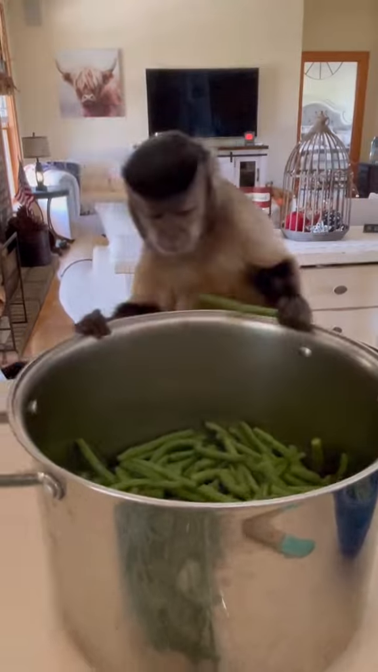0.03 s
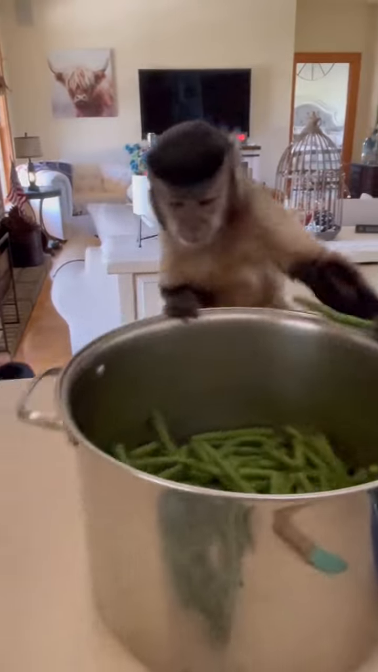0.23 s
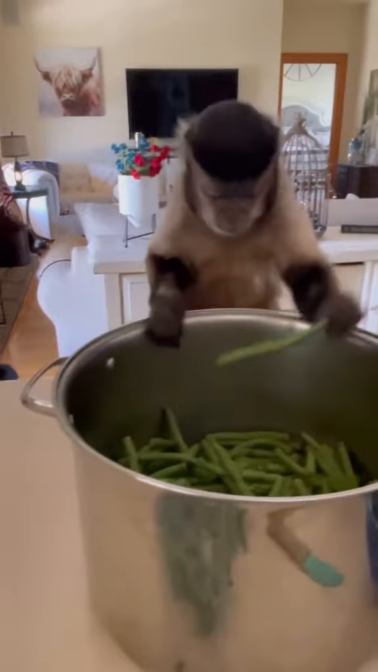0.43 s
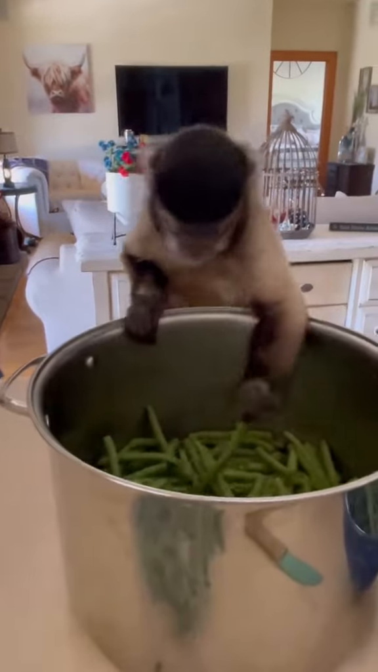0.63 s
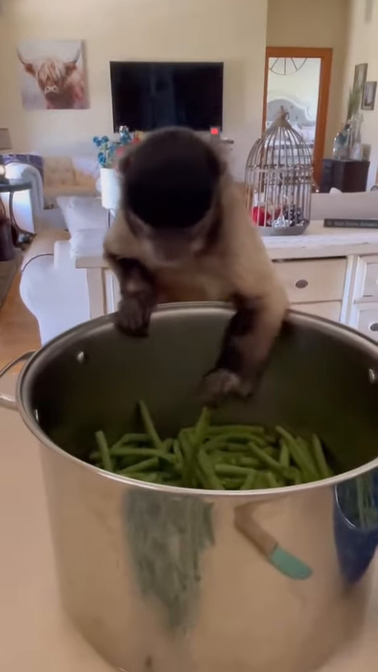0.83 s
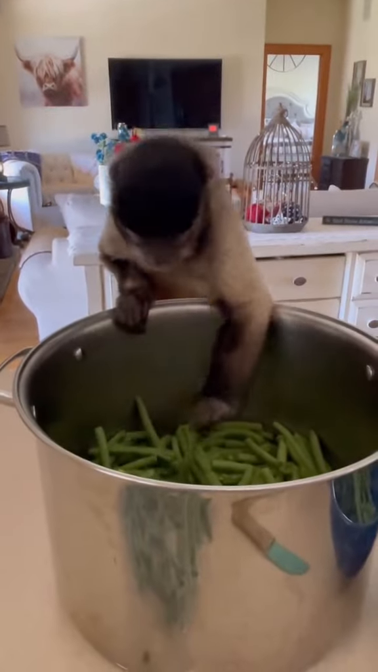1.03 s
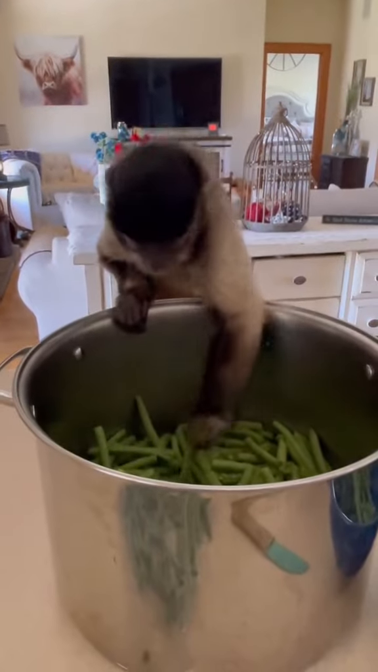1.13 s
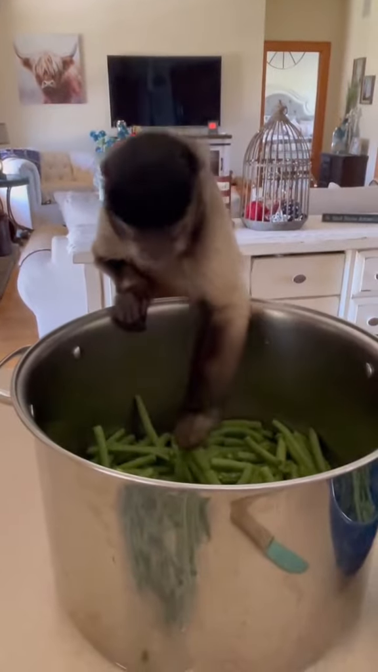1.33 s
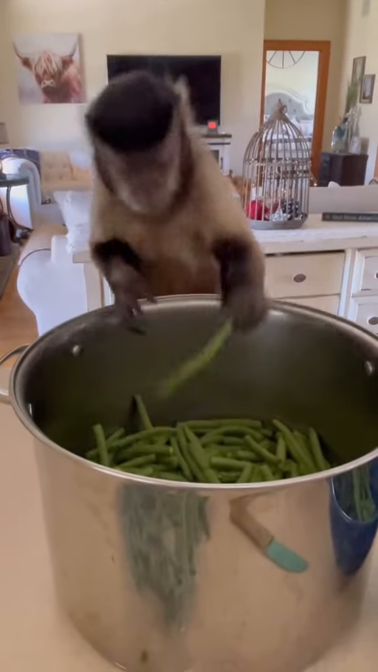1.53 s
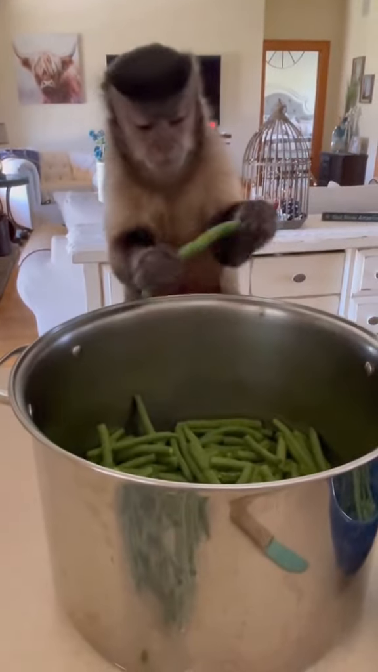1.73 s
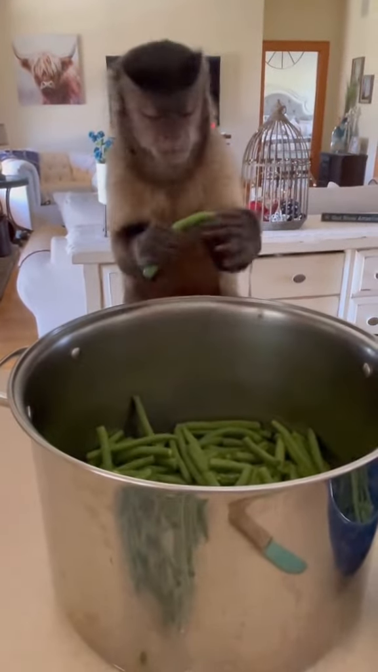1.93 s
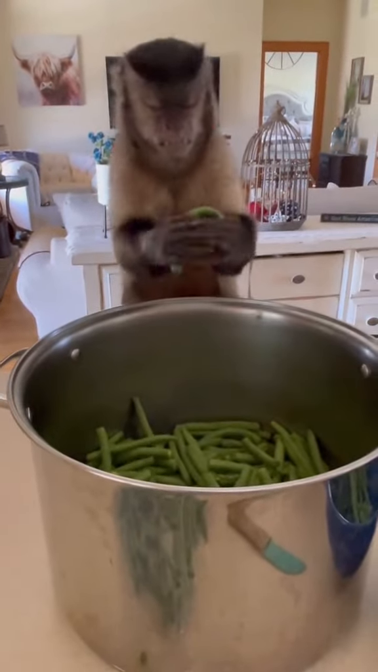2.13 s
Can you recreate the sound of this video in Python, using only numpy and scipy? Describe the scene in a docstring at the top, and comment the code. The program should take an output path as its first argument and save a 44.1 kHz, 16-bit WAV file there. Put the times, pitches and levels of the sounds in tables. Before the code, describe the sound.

Loud metallic clank of a large pot shoved on a countertop, then soft rustling and tiny snaps

```python
"""Steady low hums, two of them beating, and stereo room noise lie under everything.
A large steel pot slides over a counter (resonant friction noise), bangs down and bumps again: damped modes,
crack and knock noise, pitch-dropping counter thuds; noise tails let the room ring out.
Then soft thuds, taps and noise brushes as a small animal reaches among green beans; two faint rubs follow.
Last, a bean cracks: short noise creaks and ticks of fast-dying sines."""
import sys
import numpy as np
from scipy import signal
from scipy.fft import rfft, irfft
from scipy.io import wavfile
from scipy.ndimage import uniform_filter1d

SR = 44100
rng = np.random.default_rng(int(sys.argv[2]) if len(sys.argv) > 2 else 0)


def unload_wav(signal):
    """Save mono or channel-first audio to the path in sys.argv[1] as 16-bit WAV at rate SR, clipped to [-1, 1]."""
    wavfile.write(
        sys.argv[1],
        SR,
        np.round(np.clip(np.atleast_2d(signal).T, -1, 1) * 32767).astype(np.int16),
    )


def ratio_of_db(decibels):
    """Turn decibels (scalar or array-like) into linear amplitude factors; 0 dB maps to 1."""
    return 10 ** (np.asarray(decibels, float) / 20)


N = 97020

# pot modes: f/Hz, level/dB, t60/s
POT_MODES = [(285.1, -3, .25), (334.6, -7, .15), (430, -9, 0.087), (510, -13.5, .12), (586, -18, 0.12),
             (872, -11, 0.2), (1166, -6, 0.25), (1300, -6, 0.16), (1491, -11, 0.08), (1880, -5, 0.13),
             (2056, -2, 0.11), (2402, -7, 0.24), (2676, -7, 0.2), (3100, -3, 0.12), (3300, -11, .18),
             (3537, -7, 0.09), (4300, -8, 0.07), (4888, -9, .06), (5609, -9, .1), (6810, -14, .13),
             (8188, -13, .15)]
# pot blows: t/s, ring level/dB, contact/s, crack level/dB, knock level/dB, t60 of both noises/s
BLOWS = [(0.2238, -22.5, 0.000079, -18.5, -33.5, 0.065), (0.233, -31, 0.00039, -30, -27, 0.15),
         (.275, -33.5, 0.000065, -28.5, -32, 0.077), (0.3227, -28.5, 0.00036, -29, -21, 0.02),
         (0.329, -35, 0.00078, -47, -26, 0.11), (.36, -41.5, 0.0021, -52, -32.5, 0.049)]
# spectral density of the bright crack: f/Hz, level/dB
CRACK_SPECTRUM = [(300, -26.5), (1000, -17), (2500, -5), (4000, -1), (6000, -6.5), (8000, -7), (10600, -6),
                  (14000, -22)]
# spectral density of the dull knock: f/Hz, level/dB
KNOCK_SPECTRUM = [(100, -15), (300, 5.5), (550, -5), (1000, -4.5), (2500, -9.5), (4500, -36)]
# friction noise of the slide: t/s, level/dB
SLIDE_LEVEL = [(0, -49), (.09, -44.5), (.204, -42.5), (.22, -43), (.245, -35.5), (.3, -41.5), (0.334, -45)]
# its spectral density: f/Hz, level/dB
SLIDE_SPECTRUM = [(45, -36), (85, -5), (381, -5), (658, -14), (755, -10), (2360, -6.5), (2710, -3.5),
                  (5370, -6), (9290, -10.5), (11100, -5.5), (14000, -33.5)]
# resonances of the sliding contact: f/Hz, width/Hz, level/dB
SLIDE_PEAKS = [(730, 65, 0), (1400, 90, -3.5), (2605, 62, -2.5), (3885, 35, 4), (5400, 300, -1),
               (6870, 250, -3)]
# counter thuds, high bending waves first: t/s, level/dB, first f/Hz, last f/Hz, t60/s
THUDS = [(0.1092, -32, 1400, 106, 0.093), (0.231, -4, 194, 158.8, 0.033), (0.279, -20.5, 199.6, 132, 0.082),
         (0.3226, -20, 1400, 102.3, 0.16), (.335, -27.5, 356, 267, 0.17), (0.612, -49.5, 119.1, 90.4, 0.28),
         (0.63, -43.5, 118.4, 90, 0.12), (0.817, -44, 132.8, 91.5, 0.19), (0.956, -43.5, 122.5, 84, 0.13),
         (0.993, -53, 109, 86, 0.1), (1.096, -44.5, 299, 99, 0.11), (1.418, -49.5, 109.5, 80.2, 0.092)]
# counter-top modes: f/Hz, level/dB, t60/s
TOP_MODES = [(205, -2, .07), (345, -3, .12), (745, -6, .16), (1180, -4, .21), (1810, -11, .2)]
# light taps on the counter: t/s, level/dB, hardness (mode tilt)/dB per octave
TAPS = [(.113, -42.5, -5), (0.609, -79, 18.5), (0.806, -68, -8.5), (0.954, -61, -3), (1.094, -70.5, -10.5),
        (1.365, -80.5, 8)]
# brushes of fur and beans: t/s, length/s, level/dB, full-bodied share/0-1
BRUSHES = [(0.559, 0.11, -75.5, 0.36), (0.777, 0.071, -74, 0.16), (0.915, 0.12, -72.5, 0.07),
           (1.054, 0.06, -76, 0.02), (1.344, 0.1, -82, 0.2), (1.459, 0.083, -63, 0.95)]
# spectral density of a thin brush: f/Hz, level/dB
THIN_SPECTRUM = [(880, -1.5), (1500, -4.5), (2380, -10), (2580, -13), (4940, -7.5), (7490, -6),
                 (8890, -13.5), (10700, 0), (13000, -33)]
# spectral density of a full-bodied brush: f/Hz, level/dB
FULL_SPECTRUM = [(350, -51), (600, -2), (1700, -28), (2540, -3.5), (3370, -3), (3730, -2.5), (4030, -11),
                 (8950, -10), (10900, -27), (13000, -33.5)]
# resonances of the full-bodied brush: f/Hz, width/Hz, level/dB
BRUSH_PEAKS = [(2610, 32, 0.5), (3290, 400, -8.5), (3960, 130, 0), (4440, 150, -1), (5080, 90, 0),
               (6190, 150, -5.5)]
# faint narrow hisses: t/s, length/s, level/dB, f/Hz
RUBS = [(1.535, .055, -80, 3300), (1.585, .07, -85, 2520)]
# bean skin cracking: t/s, peak level/dB
TICKS = [(2.0256, -46.5), (2.0287, -56), (2.1484, -55), (2.1503, -64.5), (2.1721, -54), (2.1751, -50.5),
         (2.1792, -49)]
# bean modes: f/Hz, level/dB, t60/s
BEAN_MODES = [(2630, -20, 0.0075), (5870, -5, 0.005), (8080, -11, 0.0063), (10500, -4, 0.0042),
              (11400, -0.5, 0.0043)]
# fibres straining: t/s, hold/s, level/dB, t60/s
CREAKS = [(2.009, 0.021, -72, 0.056), (2.153, 0.004, -76, 0.11), (2.178, 0.012, -68, 0.053)]
# spectral density of a creak: f/Hz, level/dB
CREAK_SPECTRUM = [(1180, -52), (2000, -18), (3050, -24), (3570, -11), (4550, -14), (6230, -17), (6730, 0),
                  (9070, -9), (11500, 0), (13000, -17)]
# room decay: f/Hz, t60/s
ROOM_T60 = [(100, 0.64), (300, 0.65), (1000, 0.7), (2500, 0.65), (5500, 0.4734), (8000, 0.31),
            (12000, 0.26)]
# side relative to mid in reflections: f/Hz, level/dB
SIDE_SPECTRUM = [(60, -31.5), (180, -35.5), (530, -3), (1550, -7.5), (4600, 0.5), (13600, 0)]
# steady appliance hums: f/Hz, rms level/dB
HUMS = [(45.8, -67), (53.9, -64), (60, -77), (119, -77)]
# spectral density of the room tone: f/Hz, level/dB
QUIET_SPECTRUM = [(30, -21.5), (50, -9), (85, -13.5), (123, -11.5), (200, -11.5), (363, -21.5),
                  (526, -28.5), (1230, -41.5), (4000, -50.5), (14100, -54)]
# left-right correlation of the room tone: f/Hz, correlation/1
QUIET_LIKENESS = [(60, 1.0), (230, 0.91), (900, 0.34), (3510, 0.21), (13600, 0.28)]
# slow swell of the lower room tone: t/s, level/dB
QUIET_SWELL = [(1.25, -6), (1.5, 0), (1.75, -2.5), (2.0, -5)]
# microphone response: f/Hz, level/dB
MIC_RESPONSE = [(8200, 0.5), (9000, -8.5), (9800, -1.5), (12000, 1), (13000, -1.5), (13400, -22)]

UNEVEN_DB = 1.5  # spread of mode levels from hit to hit
CRACK_RISE_S, CRUNCH_DB = 0.0012, 1.2
FADE_FROM_S, FADE_DB_PER_S = 0.65, 245.5  # from this time any remaining pot ring fades faster
SLIDE_STOP_T60_S, SLIDE_RING_DB, SLIDE_WANDER_DB = 0.021, -4.5, 6
THUD_RISE_CYCLES, THUD_FALL_S = 0.79, 0.0049
TAP_RISE_S, PUFF_DB, PUFF_T60_S = 0.0051, 0, 0.076
BRUSH_SKEW, BRUSH_RING_DB = 0.75, 4
HUMS_IN_STEP_S = 1.54
QUIET_DB, SWELL_BELOW_HZ = -66.5, 1200
EARLY_DB, EARLY_T60_S = 3, 0.095
NEAR_DB, NEAR_T60_S = -11, 0.01
RING_WET_DB, NOISE_WET_DB, BRUSH_WET_DB, TICK_WET_DB = -17, -7.5, -9, -12.5
LOW_CUT_HZ = 50


def evened(x):
    """Scales to unit rms."""
    return x / np.sqrt(np.mean(x ** 2) + 1e-20)


def read(points, f_hz):
    """Interpolates a table over log frequency."""
    point_hz, value = np.transpose(points)
    return np.interp(np.log(f_hz + 1), np.log(point_hz + 1), value)


def add(mix, t_s, sound):
    """Adds a sound in place, cut at the end of the mix."""
    part = mix[max(round(t_s * SR), 0):][:len(sound)]
    part += sound[:len(part)]


def colour(x, points):
    """Filters by a spectrum table."""
    f_hz = np.fft.rfftfreq(x.shape[-1], 1 / SR)
    return irfft(rfft(x) * ratio_of_db(read(points, f_hz)), x.shape[-1])


def resonate(x, f_hz, width_hz):
    """Two-pole resonance of peak gain 1."""
    b, a = signal.iirpeak(f_hz, f_hz / max(width_hz, 20), SR)
    return signal.lfilter(b, a, x)


def ring(modes, t_s, offsets_db):
    """Dying sines, each with its own level offset."""
    return sum(ratio_of_db(db + offset_db - 60 * t_s / t60_s) * np.sin(2 * np.pi * f_hz * t_s)
               for (f_hz, db, t60_s), offset_db in zip(modes, offsets_db))


def pot():
    """Soft-edged pushes excite the modes; each blow adds bright crack and dull knock noise."""
    tones, noises = np.zeros(N), np.zeros(N)
    t_s = np.arange(SR // 2) / SR
    crack = evened(colour(rng.standard_normal(N), CRACK_SPECTRUM))
    knock = evened(colour(rng.standard_normal(N), KNOCK_SPECTRUM))
    # loose beans rattle in the crack
    rattle = evened(uniform_filter1d(rng.standard_normal(N), size=70))
    crack = evened(crack * ratio_of_db(CRUNCH_DB * rattle))
    uneven_db = UNEVEN_DB * rng.standard_normal((len(BLOWS), len(POT_MODES)))
    for (start_s, ring_db, contact_s, crack_db, knock_db, t60_s), offsets_db in zip(BLOWS, uneven_db):
        push = t_s[:400] * np.exp(-t_s[:400] / (abs(contact_s) / 4 + 1e-5))
        fade = ratio_of_db(-FADE_DB_PER_S * np.maximum(t_s - max(FADE_FROM_S - start_s, 0), 0))
        modes = fade * ring(POT_MODES, t_s, offsets_db)
        add(tones, start_s, ratio_of_db(ring_db) * signal.oaconvolve(modes, push / push.sum()))
        noise = ratio_of_db(crack_db) * crack + ratio_of_db(knock_db) * knock
        envelope = np.minimum(t_s / CRACK_RISE_S, 1) * ratio_of_db(-60 * t_s / t60_s)
        add(noises, start_s, envelope * noise[round(start_s * SR):][:len(t_s)])
    return tones, noises


def slide():
    """Friction noise plus contact resonances that come and go."""
    t_s = np.arange(N) / SR
    point_s, level_db = np.transpose(SLIDE_LEVEL)
    grit = rng.standard_normal(N)
    wander = evened(uniform_filter1d(rng.standard_normal((len(SLIDE_PEAKS), N)), size=1300))
    peaks = sum(ratio_of_db(db + SLIDE_WANDER_DB * drift) * resonate(grit, f_hz, width_hz)
                for (f_hz, width_hz, db), drift in zip(SLIDE_PEAKS, wander))
    friction = evened(colour(grit, SLIDE_SPECTRUM)) + ratio_of_db(SLIDE_RING_DB) * evened(peaks)
    stop_db = -60 * np.maximum(t_s - point_s[-1], 0) / SLIDE_STOP_T60_S
    return friction * ratio_of_db(np.interp(t_s, point_s, level_db) + stop_db)


def counter():
    """Damped thuds of fast-settling pitch; light taps ring the top with a noise puff."""
    out, t_s = np.zeros(N), np.arange(SR // 2) / SR
    for start_s, db, first_hz, last_hz, t60_s in THUDS:
        f_hz = last_hz + (first_hz - last_hz) * np.exp(-t_s / THUD_FALL_S)
        rise = 1 - np.exp(-t_s * first_hz / THUD_RISE_CYCLES)
        add(out, start_s, rise * ratio_of_db(db - 60 * t_s / t60_s) * np.sin(2 * np.pi * np.cumsum(f_hz) / SR))
    octaves = np.log2(np.array(TOP_MODES)[:, 0] / TOP_MODES[2][0])  # from the third mode
    uneven_db = UNEVEN_DB * rng.standard_normal((len(TAPS), len(TOP_MODES)))
    for (start_s, db, tilt_db), offsets_db in zip(TAPS, uneven_db):
        noise = evened(colour(rng.standard_normal(len(t_s)), KNOCK_SPECTRUM))
        puff = ratio_of_db(PUFF_DB - 60 * t_s / PUFF_T60_S) * noise
        modes = ring(TOP_MODES, t_s, offsets_db + tilt_db * octaves)
        add(out, start_s, np.minimum(t_s / TAP_RISE_S, 1) * ratio_of_db(db) * (modes + puff))
    return out


def brushes():
    """Noise swells between a thin and a full, ringing colour, then narrow-band rubs."""
    t_s, out = np.arange(N) / SR, np.zeros(N)
    thin = evened(colour(rng.standard_normal(N), THIN_SPECTRUM))
    full = evened(colour(rng.standard_normal(N), FULL_SPECTRUM))
    peaks = sum(ratio_of_db(db) * resonate(full, f_hz, width_hz) for f_hz, width_hz, db in BRUSH_PEAKS)
    full = evened(full + ratio_of_db(BRUSH_RING_DB) * evened(peaks))
    for start_s, length_s, db, share in BRUSHES:
        arch = np.sin(np.pi * np.clip((t_s - start_s) / length_s, 0, 1) ** BRUSH_SKEW)
        share = np.clip(share, 0, 1)
        out += ratio_of_db(db) * arch ** (1 + share) * (np.sqrt(1 - share) * thin + np.sqrt(share) * full)
    for start_s, length_s, db, f_hz in RUBS:
        arch = np.sin(np.pi * np.clip((t_s - start_s) / length_s, 0, 1))
        out += ratio_of_db(db) * arch * evened(resonate(thin, f_hz, f_hz / 15))
    return out


def bean():
    """Fibres creak as noise while the bean bends; each tick rings its modes briefly."""
    out, t_s = np.zeros(N), np.arange(SR // 5) / SR
    uneven_db = UNEVEN_DB * rng.standard_normal((len(TICKS), len(BEAN_MODES)))
    for (start_s, peak_db), offsets_db in zip(TICKS, uneven_db):
        tick = np.minimum(t_s / 0.0005, 1) * ring(BEAN_MODES, t_s, offsets_db)
        add(out, start_s, ratio_of_db(peak_db) * tick / abs(tick).max())
    for start_s, hold_s, db, t60_s in CREAKS:
        noise = evened(colour(rng.standard_normal(len(t_s)), CREAK_SPECTRUM))
        fade_db = -60 * np.maximum(t_s - hold_s, 0) / t60_s
        add(out, start_s, np.minimum(t_s / 0.0019, 1) * ratio_of_db(db + fade_db) * noise)
    return out


def room(x):
    """Mid and side noise tails, each band dying at its own rate, with a faster-dying early part."""
    f_hz, t_s, z = signal.stft(rng.standard_normal((2, SR)), SR, nperseg=256)
    decay = ratio_of_db(-60 * t_s / read(ROOM_T60, f_hz)[:, None])
    early = 1 + ratio_of_db(EARLY_DB - 60 * t_s / EARLY_T60_S)
    tail = signal.istft(z * decay * early, SR, nperseg=256)[1]
    tail = tail * np.clip(np.arange(tail.shape[1]) / SR / 0.0029 - 0.3, 0, 1)  # delayed onset
    mid, side = signal.fftconvolve(x[None], tail / np.linalg.norm(tail[0]), axes=1)[:, :N]
    side = colour(side, SIDE_SPECTRUM)
    return np.array([mid + side, mid - side])


def near_side(x):
    """Close reflections, opposite in left and right, from a very short noise tail."""
    t_s = np.arange(SR // 20) / SR
    tail = rng.standard_normal(len(t_s)) * ratio_of_db(-60 * t_s / NEAR_T60_S)
    reflected = signal.oaconvolve(x, tail / np.linalg.norm(tail))[:N]
    side = ratio_of_db(NEAR_DB) * colour(reflected, SIDE_SPECTRUM)
    return np.array([side, -side])


def hum():
    """Steady sines, equal in phase at one instant; the two lowest beat."""
    t_s = np.arange(N) / SR - HUMS_IN_STEP_S
    phase_rad = 2 * np.pi * rng.random()
    return sum(np.sqrt(2) * ratio_of_db(db) * np.sin(2 * np.pi * f_hz * t_s + phase_rad) for f_hz, db in HUMS)


def quiet():
    """Stereo noise, alike in both channels in the bass; its lower part swells."""
    a, b = rfft(rng.standard_normal((2, N)))
    f_hz = np.fft.rfftfreq(N, 1 / SR)
    likeness = np.clip(read(QUIET_LIKENESS, f_hz), -1, 1)
    mid, side = a * np.sqrt(1 + likeness), b * np.sqrt(1 - likeness)
    tone = evened(irfft(np.array([mid + side, mid - side]) * ratio_of_db(read(QUIET_SPECTRUM, f_hz)), N))
    low = signal.sosfiltfilt(signal.butter(1, SWELL_BELOW_HZ, fs=SR, output="sos"), tone)
    swell = ratio_of_db(np.interp(np.arange(N) / SR, *np.transpose(QUIET_SWELL)))
    return ratio_of_db(QUIET_DB) * (tone - low + low * swell)


def scene():
    """Direct sound in the middle, spread by reflections, over hums and room tone."""
    tones, noises = pot()
    tones, noises = tones + counter(), noises + slide()
    soft, ticks = brushes(), bean()
    send = ratio_of_db(RING_WET_DB) * tones + ratio_of_db(NOISE_WET_DB) * noises
    send += ratio_of_db(BRUSH_WET_DB) * soft + ratio_of_db(TICK_WET_DB) * ticks
    direct = tones + noises + soft + ticks
    return direct + near_side(tones + noises) + room(send) + hum() + quiet()


def low_pass(x):
    """Removes everything above the highest recorded frequency."""
    return signal.sosfilt(signal.butter(12, 14210, fs=SR, output="sos"), x)


def record(dry):
    """Microphone response, then a second-order low cut."""
    low_cut = signal.butter(2, LOW_CUT_HZ, "high", fs=SR, output="sos")
    mix = signal.sosfilt(low_cut, colour(dry, MIC_RESPONSE))
    return low_pass(mix)


dry = scene()
out = record(dry)
unload_wav(out)
```